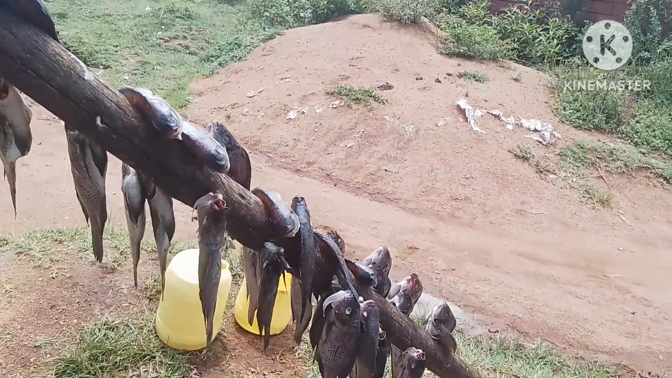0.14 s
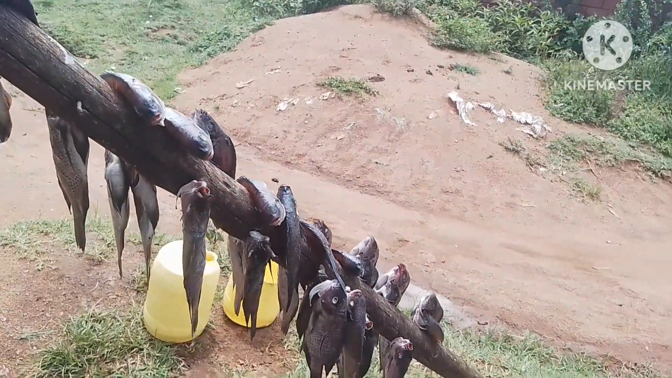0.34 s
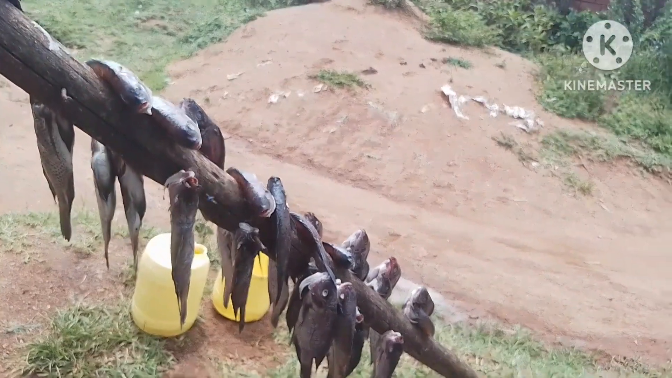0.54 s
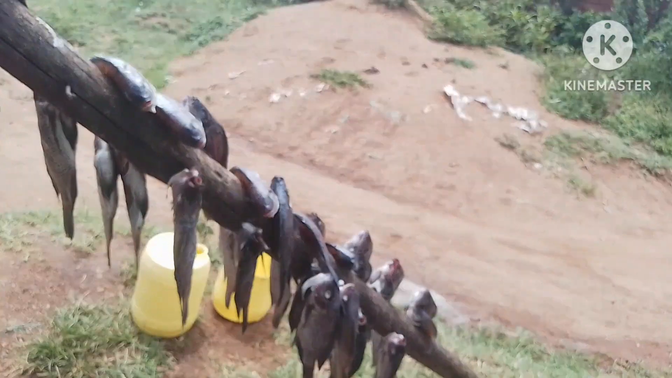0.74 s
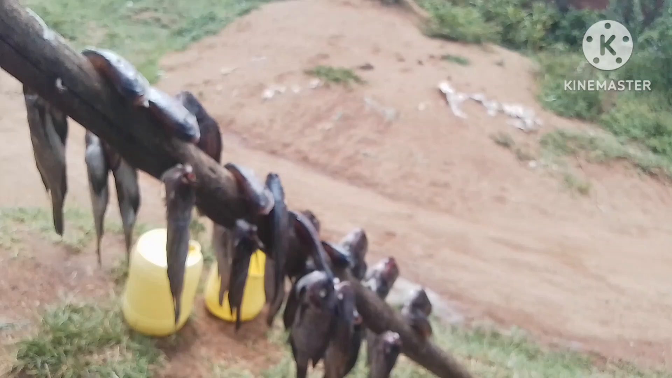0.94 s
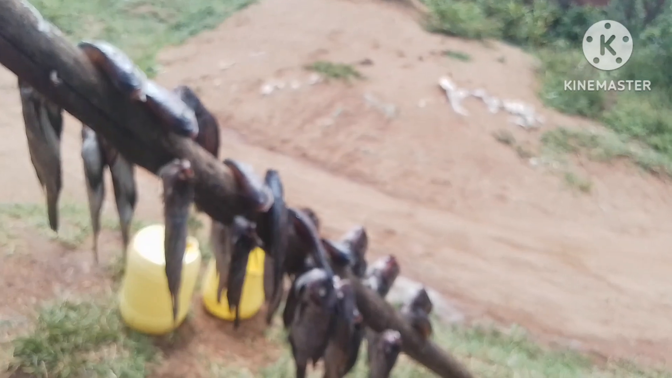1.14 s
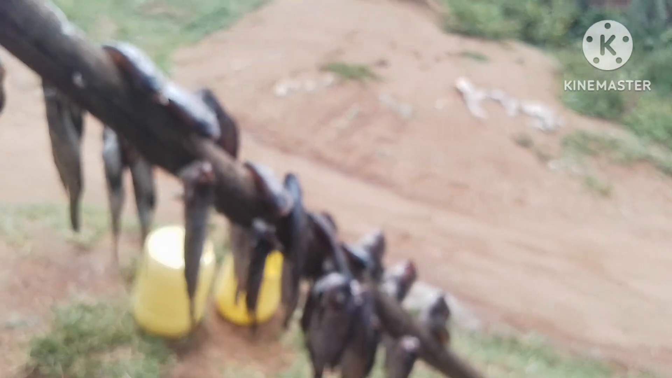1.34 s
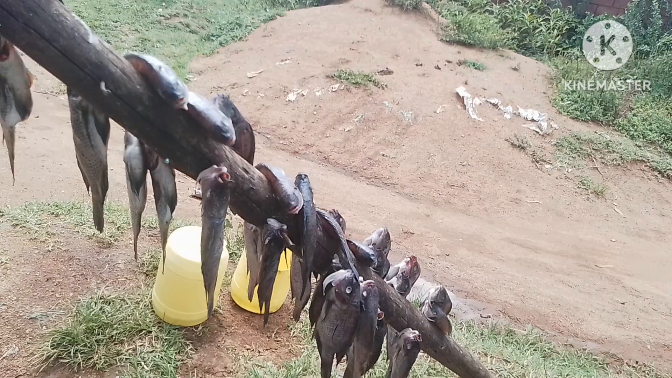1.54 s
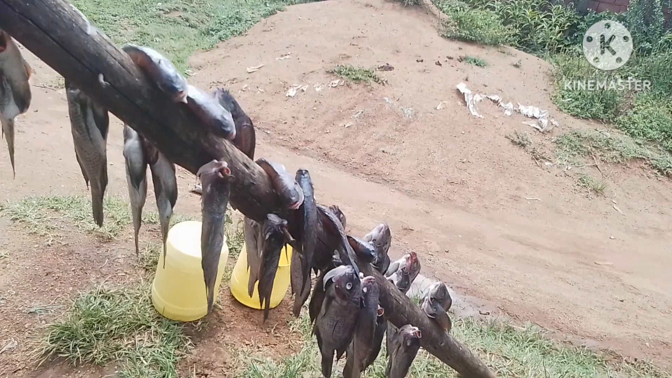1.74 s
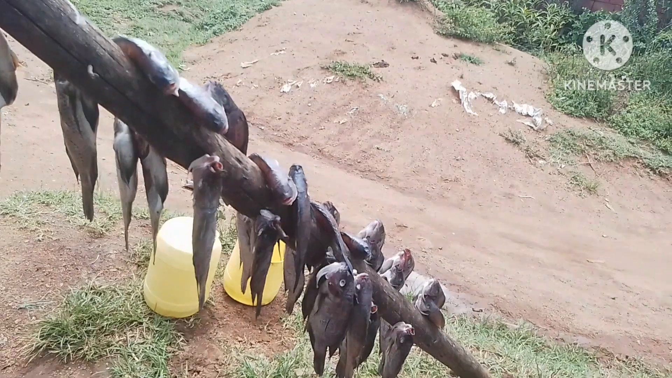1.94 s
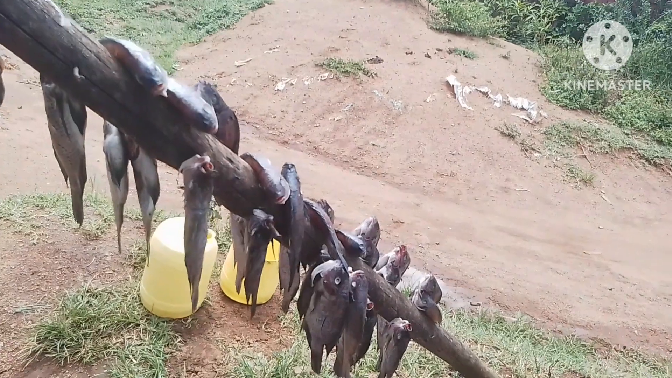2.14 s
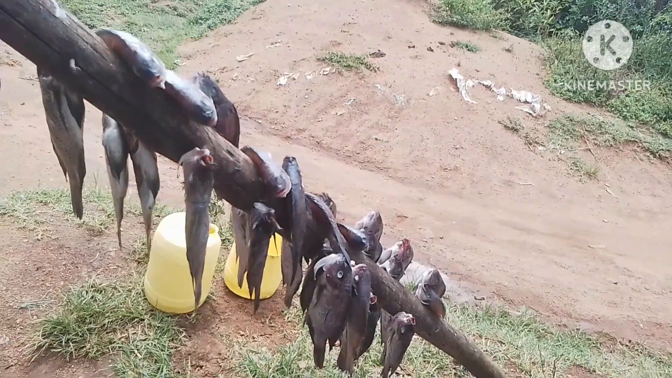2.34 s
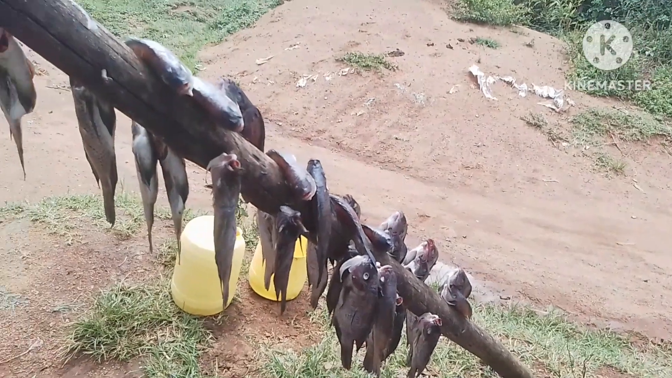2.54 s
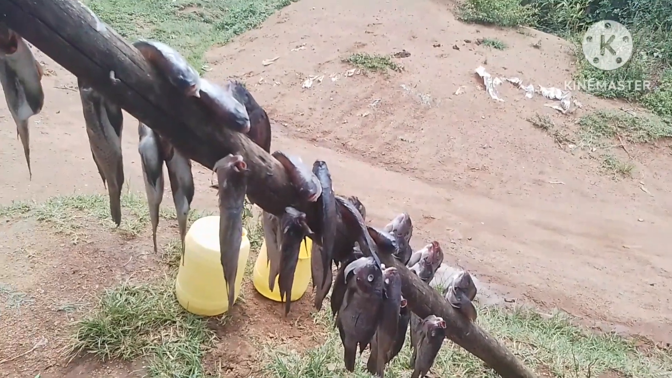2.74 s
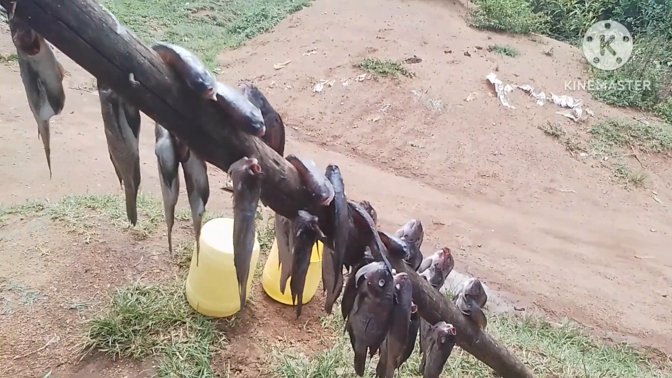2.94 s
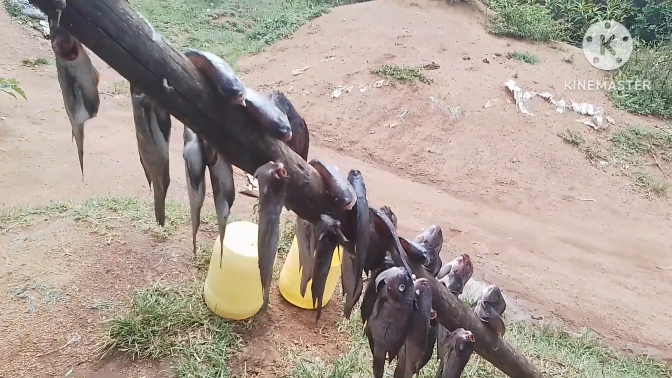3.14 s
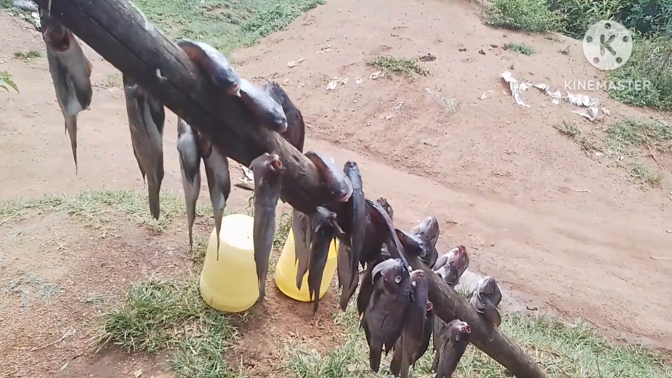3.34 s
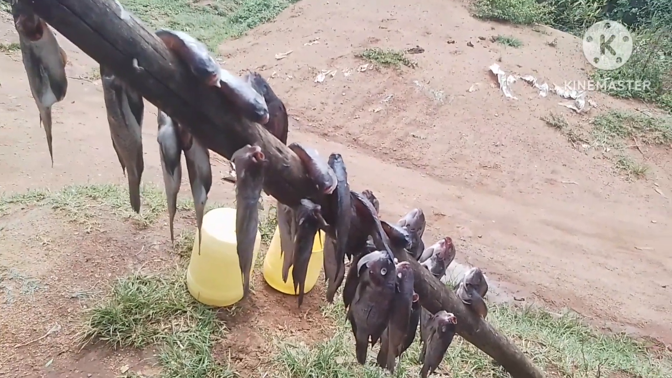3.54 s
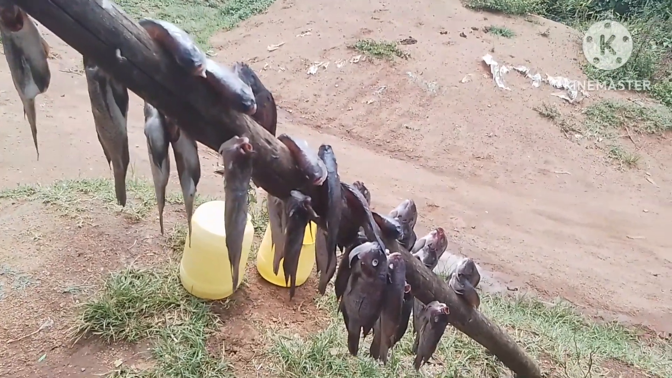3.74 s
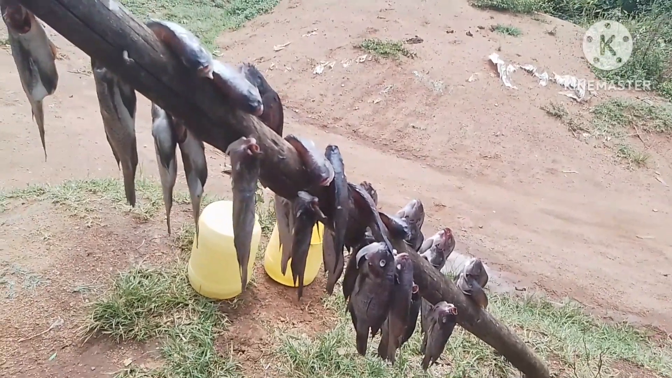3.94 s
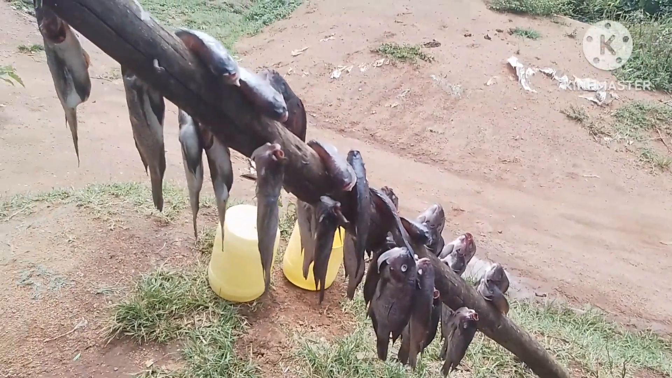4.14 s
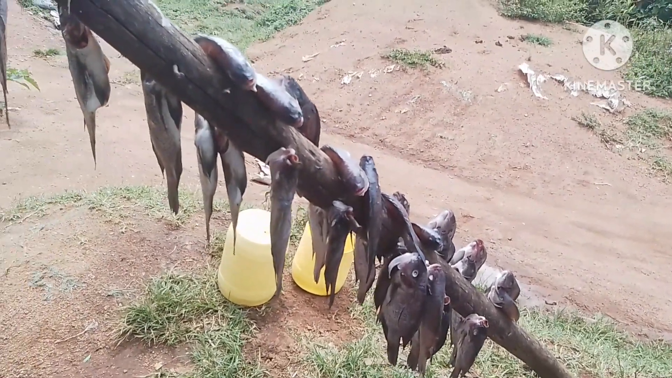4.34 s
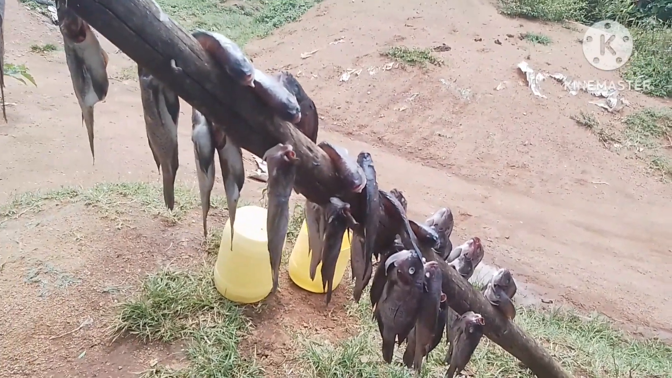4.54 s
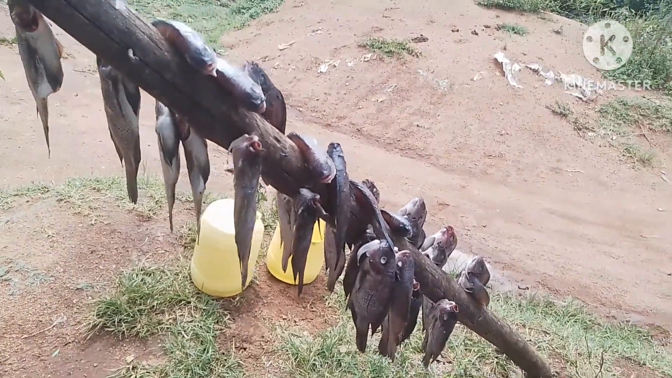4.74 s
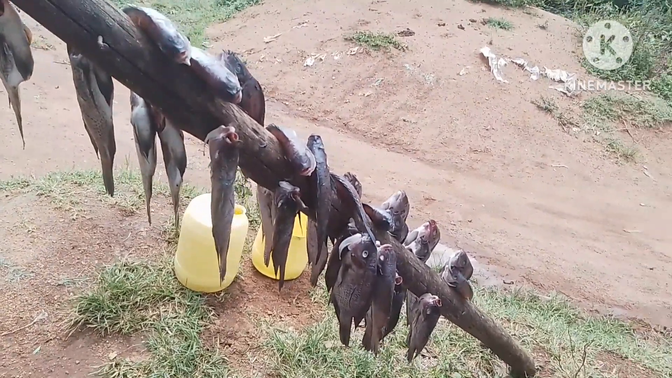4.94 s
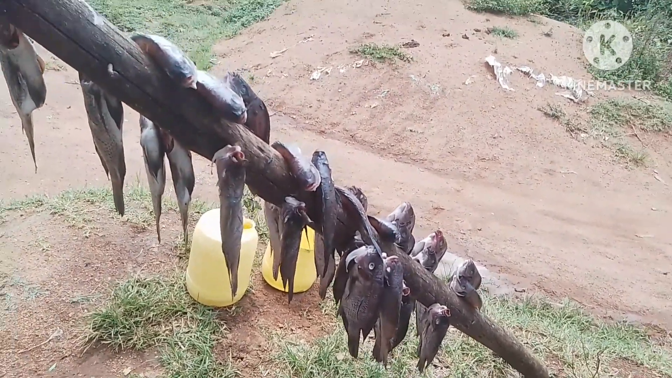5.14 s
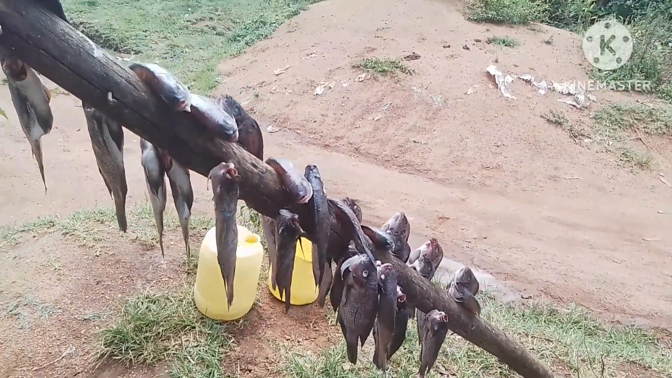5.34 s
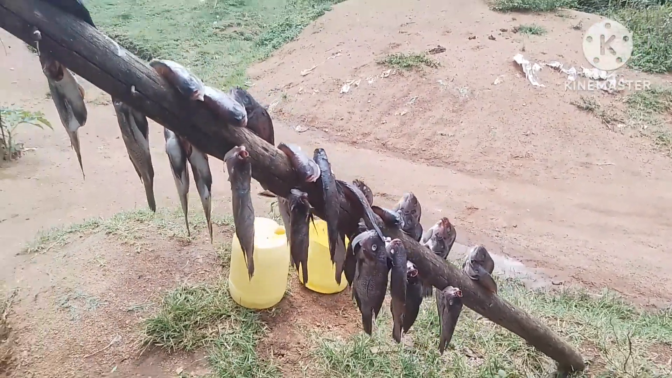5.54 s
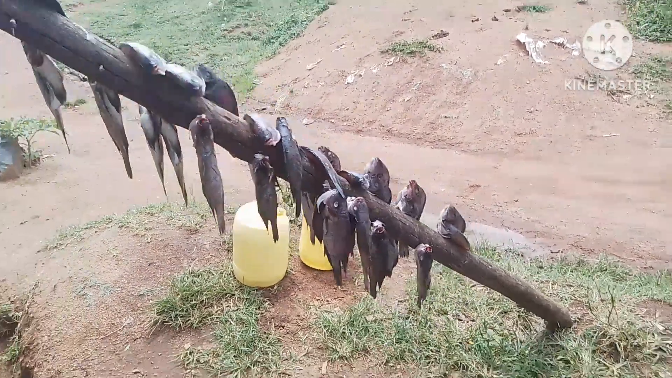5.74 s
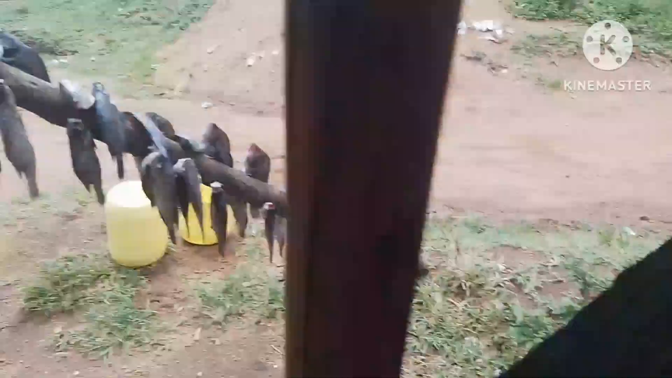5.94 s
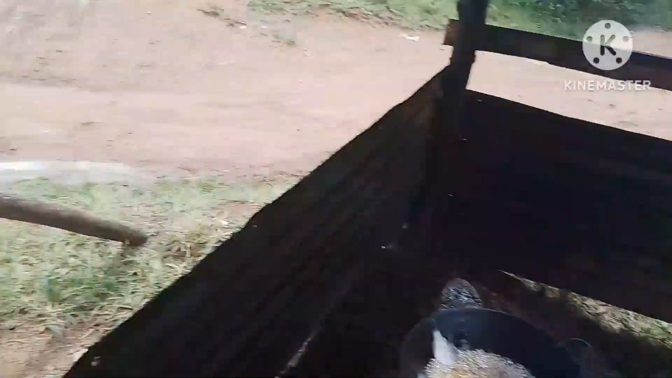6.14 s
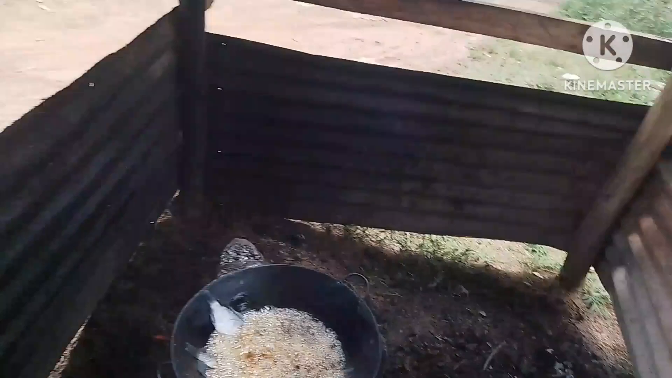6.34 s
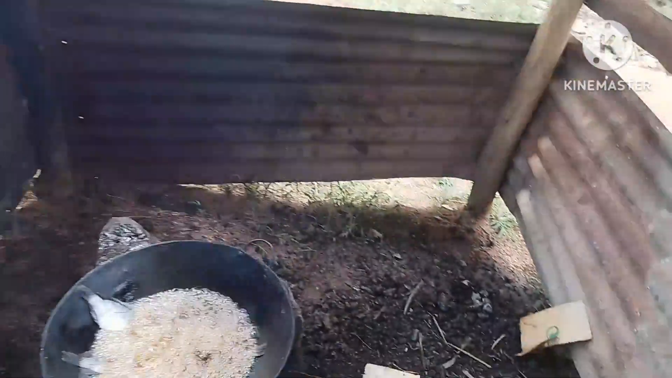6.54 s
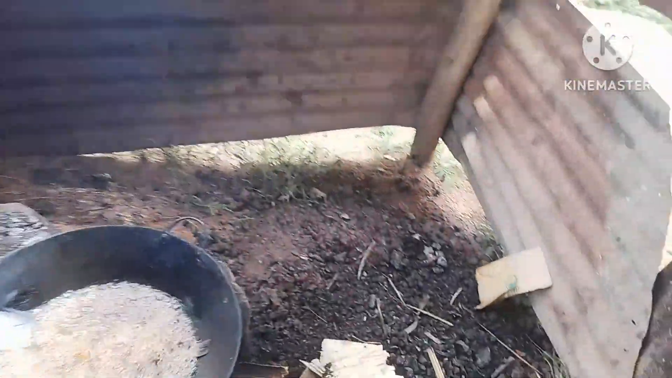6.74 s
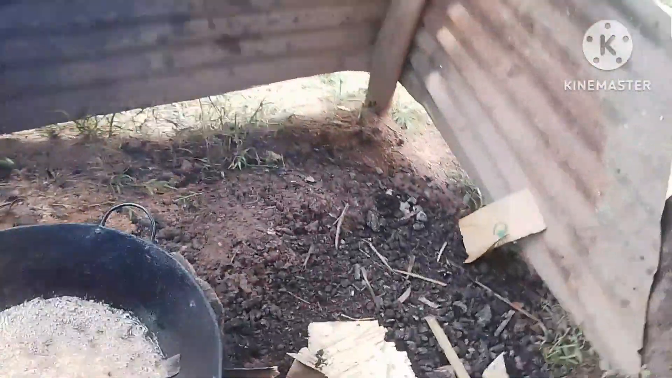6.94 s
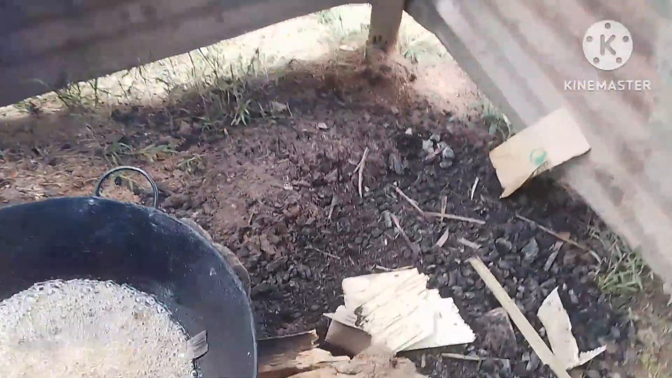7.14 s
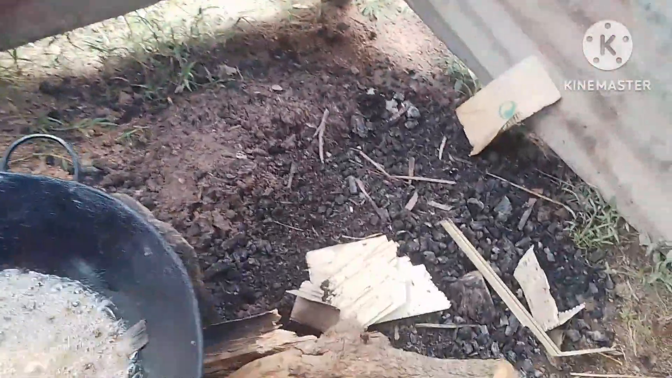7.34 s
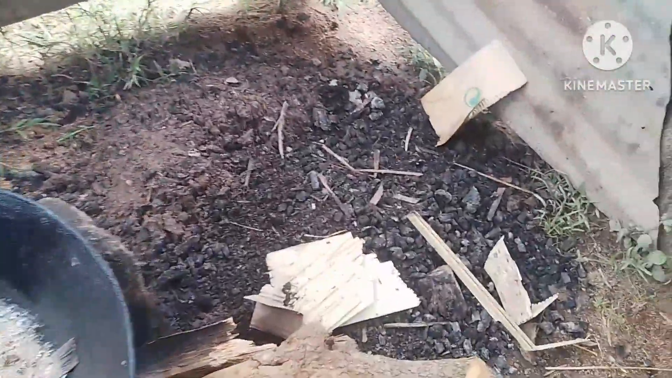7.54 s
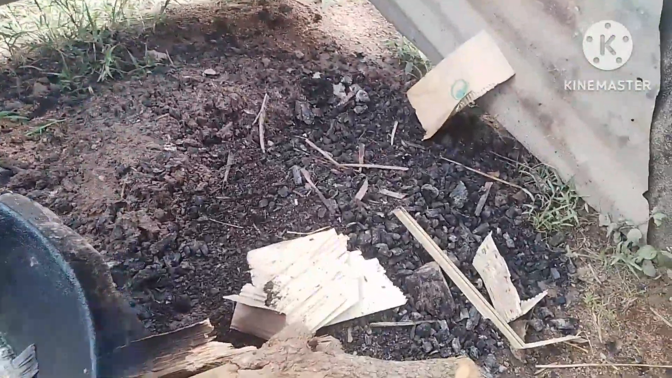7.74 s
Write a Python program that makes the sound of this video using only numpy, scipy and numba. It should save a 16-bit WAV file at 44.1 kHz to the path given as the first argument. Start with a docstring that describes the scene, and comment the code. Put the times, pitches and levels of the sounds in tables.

```python
"""In an open shelter of corrugated iron, fish fry in a wok of hot oil over charcoal; the microphone nears it late.
Steam bubbles are random clicks and decaying sines, filtered into sizzle, spray, foam and boil.
Droplets spit and steam pockets pop as dying noise; large bubbles, and a microphone knock, ring as gliding sines.
Outside, a far engine drones as a sum of harmonics that sink in pitch, until the shelter screens it.
A low rumble of filtered noise and a faint hum lie beneath. Mono, on two equal channels."""
import sys
import numpy as np
from scipy import signal
from scipy.fft import rfft, irfft
from scipy.io import wavfile
from scipy.ndimage import map_coordinates
from numba import njit

SR = 44100
rng = np.random.default_rng(int(sys.argv[2]) if len(sys.argv) > 2 else 0)


def inscribe(sig):
    """Save sig as 16-bit PCM at rate SR to the path in sys.argv[1].

    A 1-D sig is mono; a 2-D sig holds one channel per row.
    Samples are clipped to [-1, 1] before scaling.
    """
    pcm = np.round(np.clip(np.atleast_2d(sig).T, -1, 1) * 32767)
    wavfile.write(sys.argv[1], SR, pcm.astype(np.int16))


N = 343098
TIME = np.arange(N) / SR  # seconds


def sizzle(flurry):
    """Bubble resonance: tiny steam bubbles burst and ring round one bright pitch that rises over the oil."""
    # Spectrum of the sizzle before its pitch rises. Each row: frequency in Hz, level in dB.
    sizzle_colour = [(1000, -62.5), (2000, -21), (2750, -8.5), (3480, -2.5), (4300, 1.5), (5020, 4.5),
                     (5620, 2), (6350, -4.5), (7380, -8.5), (9000, -17.5), (15000, -29)]
    cracks = scatter(bursts(per_s=9000, spread_db=1.5), t60=0.04, wet_db=-2.0)
    rings = bubbles(count=5000, low_hz=2494, high_hz=6965, cycles=200, spread_db=2.5)
    fizz = colour(cracks + undb(-11.5) * rings, sizzle_colour)
    # reading the sound up to a tenth faster raises its pitch by that share
    reading_speed = 1 + np.interp(TIME, [6.25, 7.1], [0, 0.1])
    raised = map_coordinates(fizz, [np.cumsum(reading_speed)], order=3, mode="wrap")
    return unit(raised) * undb(0.55 * flurry + 0.35 * walk(count=160))


def spitting(flurry):
    """Impulsive excitation: fine droplets tick in the top octave, and fewer, sharper ones fly out."""
    # Spectrum of the fine spray. Each row: frequency in Hz, level in dB.
    spit_colour = [(4000, -16), (7000, -15), (8500, 0.5), (9800, 0.5), (11300, 5), (13000, -1),
                   (15500, -1.5)]
    ticks = scatter(bursts(per_s=5600, spread_db=4.0), t60=0.036, wet_db=4)
    rings = bubbles(count=4000, low_hz=7530, high_hz=13670, cycles=330, spread_db=3.5)
    strays = scatter(bursts(per_s=45, spread_db=2.8), t60=0.0064, wet_db=-21)
    sharp = resonate(strays, np.full(N, 13000.), 3000.)
    spray = colour(ticks + undb(-9.0) * rings, spit_colour)
    level_db = 1.0 * flurry + 0.65 * walk(count=14)
    return unit(spray + undb(-18) * unit(sharp)) * undb(level_db)


def seething(flurry):
    """Bubble resonance at middle size: bubbles break in the foam round the fish, crackling and ringing."""
    # Spectrum of the foam. Each row: frequency in Hz, level in dB.
    seethe_colour = [(800, -22.5), (1020, -14), (1120, -1.5), (1450, -1), (1750, 1), (2400, 6), (3200, 5),
                     (5000, -9.5)]
    crackle = bursts(per_s=5000, spread_db=1.0)
    rings = bubbles(count=5000, low_hz=957.6, high_hz=3125, cycles=88, spread_db=1.5)
    foam = colour(crackle + undb(-9.5) * rings, seethe_colour)
    return foam * undb(0.47 * flurry + 0.55 * walk(count=20))


def boiling():
    """Larger bubbles ring lower: they roll up through the deep oil in uneven waves."""
    # Spectrum of the boil. Each row: frequency in Hz, level in dB.
    boil_colour = [(150, -14), (300, -4), (400, 1), (475, 5), (540, 2.5), (640, 1.5), (820, 6), (1000, 3),
                   (1400, -2)]
    crackle = bursts(per_s=3500, spread_db=1.47)
    rings = bubbles(count=900, low_hz=338.8, high_hz=1006, cycles=74, spread_db=0.0)
    roll = colour(crackle + undb(-16.0) * rings, boil_colour)
    return roll * undb(0.68 * walk(count=8))


def splutter():
    """Transients standing out: spits and pops are damped noise; plops and one knock are damped sines."""
    # Levels here are relative within each group; a common gain follows.
    # Droplets spitting out of the oil. Each row: start in seconds, level in dB, pitch in Hz.
    spit_events = [(.0488, -16, 11500), (.291, -16, 11500), (.348, -14, 11500), (.576, -17, 8500),
                   (.6504, -7.5, 12000), (.6694, -14, 12000), (.7936, -8, 12000), (.8254, -11, 11500),
                   (.8904, -19, 14000), (1.954, -17, 11500), (3.7763, -12.5, 13000), (3.8, -15, 13500),
                   (4.097, -10, 11500), (4.134, -12, 11000), (4.9252, -9, 10900), (4.9938, -9, 12000),
                   (5.007, -13, 12500), (5.096, -17, 13500), (5.17, -13, 9500), (5.3114, -17, 13000),
                   (5.401, -12, 12500), (5.7553, -16, 11400), (6.0815, -11, 10500), (6.1735, -3, 14200),
                   (6.2726, -13, 9000), (6.315, -11, 11400), (6.6228, -13, 8300), (6.7361, -4, 11800),
                   (6.7555, -12, 12900), (6.781, -8, 12000), (6.8982, -10, 12000), (6.9237, -7, 11600),
                   (6.9865, -9, 9500), (7.076, -8, 12000), (7.0948, -6, 11000), (7.1418, -1.5, 11400),
                   (7.24, -6, 12500), (7.441, -6, 12000), (7.4914, -9, 11100), (7.5448, -2, 12500),
                   (7.6296, -8, 12100), (7.706, -6, 12500)]
    # Steam pockets bursting.
    # Each row: start in seconds, level in dB, pitch in Hz, bandwidth in Hz, T60 in seconds.
    pop_events = [(0.153, -7, 4960, 1200, 0.027), (0.251, -5, 4940, 1200, .025), (.617, -8, 5100, 800, .04),
                  (.649, -4, 5030, 1190, .045), (.956, -4, 4800, 1200, 0.033), (1.357, -8, 4000, 800, .047),
                  (1.656, -10.5, 4900, 1200, .03), (2.683, -6, 4840, 1200, .03),
                  (3.937, -9, 3900, 1800, .03), (3.951, -8, 4900, 1200, .04), (4.099, -4, 4710, 1000, .05),
                  (5.324, -8.5, 5130, 800, .04), (5.796, -6, 5050, 1200, .03), (6.08, -5.5, 4900, 800, .04),
                  (6.341, -11, 1500, 1500, 0.061), (6.357, -3, 4870, 1500, .05),
                  (6.362, -5, 1900, 1700, 0.05), (6.441, -6.5, 2400, 1800, .032),
                  (6.465, -14, 1250, 500, .04), (6.492, -1, 4900, 2000, .01), (6.558, -4, 5350, 1200, .04),
                  (6.634, 3.5, 4900, 2000, 0.024), (6.697, -2, 5400, 1800, .03),
                  (6.719, -3, 5100, 1200, .035), (6.861, 1, 5470, 800, 0.068),
                  (6.949, -6, 5400, 2500, .008), (6.959, -4, 5400, 2500, .008),
                  (7.015, -8, 5600, 1600, .02), (7.024, -2, 5600, 800, .03), (7.074, 0, 6000, 1600, .018),
                  (7.141, -1, 6600, 400, .028), (7.362, 2, 4900, 1800, .028), (7.477, 1, 5600, 800, 0.037),
                  (7.509, -17, 620, 400, .045), (7.57, -4, 3100, 1000, .06), (7.625, 4, 5340, 2500, .007),
                  (7.706, -4, 3000, 1200, 0.054), (7.721, -13, 1510, 900, .067)]
    # Large bubbles; the ring at 6.167 s is a knock from handling the microphone.
    # Each row: start in seconds, level in dB, pitch in Hz, T60 in seconds.
    ring_events = [(1.084, -25, 1220, .06), (1.478, -23, 465, .06), (1.849, -25, 822, .06),
                   (4.162, -30, 600, .05), (5.784, -22, 1500, .06), (6.167, -18.5, 466, .06),
                   (6.209, -24, 350, .065), (6.364, -29, 680, .05), (6.61, -25.5, 390, .05),
                   (6.808, -20, 1181, .055), (7.026, -23, 1210, .06), (7.032, -24.5, 450, .05),
                   (7.476, -15, 1170, .05), (7.509, -11.5, 1100, .055), (7.72, -20, 1160, .08),
                   (7.722, -26, 440, .06)]
    spits, pops, rings = np.zeros((3, N))
    for s, db, hz in spit_events:
        add(spits, s, undb(db) * puff(hz, width=11000, t60=0.021))
        # finer drops trail after each spit
        add(spits, s, undb(db - 10) * puff(hz, width=11000, t60=0.09))
    for s, db, hz, width, t60 in pop_events:
        add(pops, s, undb(db) * puff(hz, width, t60))
    for s, db, hz, t60 in ring_events:
        ring = bubble(hz, t60, glide=0.018)
        # noise roughens each ring: in a bubble, its skin tears
        rough = puff(hz, hz / 2, t60) / 2
        add(rings, s, undb(db) * (ring + rough) / 2)
    return undb(-8.0) * spits + undb(-8.5) * pops + undb(1.0) * rings


def walls(x, over_rim):
    """Interference of reflections: shelter and wok sides lift or hollow bands, shifting with the microphone."""
    # Three moving bands. Each row: time in seconds, centre frequency in Hz, gain at the centre in dB.
    crest_band = [(0, 5200, 0.5), (2.2, 4500, -1), (2.8, 4700, 2.5), (4.6, 4960, -1), (5.4, 4800, -1.5),
                  (5.72, 4500, -6), (5.95, 4670, -2.5), (6.2, 5100, 3), (6.55, 5300, 2), (6.9, 5600, 0.5),
                  (7.1, 5900, 1), (7.4, 5670, 0.5), (7.78, 5850, 1.5)]
    upper_band = [(0, 4100, 0), (.5, 4000, 2.5), (.95, 2800, 1.5), (1.4, 2570, -0.5), (5.4, 2400, -0.5),
                  (5.7, 2480, -8.5), (5.88, 2800, -1), (6.05, 3200, 3.5), (6.28, 2980, 2), (6.42, 3500, -2),
                  (6.7, 3500, 0.5)]
    lower_band = [(0, 830, 2.5), (.55, 844, 2.5), (.75, 1100, -4), (1.2, 1640, 3.5), (5.4, 1580, 1.5),
                  (5.95, 2020, 7.5), (6.17, 1730, -8), (6.4, 1930, 5), (6.7, 1720, 6.5), (7.05, 1650, -5),
                  (7.3, 2000, 2), (7.78, 1900, 3)]
    for band, width_hz in (crest_band, 600.), (upper_band, 1160.), (lower_band, 160.):
        hz, db = curves(band)
        x = x + (undb(db) - 1) * resonate(x, hz, width_hz)
    # above the wok a 3 dB gap opens just under the foam
    hollow = resonate(x, np.full(N, 900.), 160.)
    return x + (undb(-3 * over_rim) - 1) * hollow


def engine():
    """Harmonic series of a firing rate: the drone sinks in pitch and wavers until the iron screens it."""
    # Harmonics of the engine, with levels before and after its change of tone.
    # Each row: multiple of the firing rate, earlier level in dB, later level in dB.
    engine_orders = [(3, -19.5, -19), (4, -7, -7.5), (5, -9, -5.5), (6, -7, 2), (7, -6, -12),
                     (8, -11, -3.5), (9, -19, -5), (10, -24, -10.5), (11, -15, 1.5)]
    # Single harmonics swell out of the drone or drop away for a moment.
    # Each row: multiple, time of the middle in seconds, width at half height in seconds, change in dB.
    engine_swells = [(3, 0.86, .3, 16), (4, 0.67, 0.61, -11), (4, 2, 0.52, 5), (4, 2.88, .25, -14),
                     (4, 4.1, .2, -12), (4, 4.72, .22, -14), (4, 5.82, 0.3, 8), (5, 1.4, 1.2, 0),
                     (5, 2.55, .5, 8), (5, 3.04, 0.23, -12), (6, 1.22, 0.18, 5.5), (6, 2.76, .55, 5),
                     (6, 3.35, .14, -12), (6, 4.02, 0.11, -11), (6, 5, .09, -14), (6, 5.4, 0.2, 5.5),
                     (6, 5.8, 0.35, -12), (6, 6.28, 0.32, 3.5), (7, 0.87, 1.3, -3), (7, 2.22, 0.28, 7),
                     (7, 2.55, .25, -8), (7, 3.05, 0.27, 4), (7, 4.35, .3, 7), (10, 4.82, .18, 16),
                     (11, 4.7, 0.093, -3), (11, 5.3, .15, -6), (11, 5.95, .15, -3)]
    firing_hz = 32.2 - 0.71 * TIME
    phase = 2 * np.pi * np.cumsum(firing_hz) / SR
    # loudest at 3.4 s, growing and fading by 0.7 dB a second
    level_db = -51.5 - 0.7 * np.abs(TIME - 3.4)
    level_db += -30 * ramp(6.58, length=0.32)  # the iron walls cut off the engine
    # most of the upper harmonics come through between these times
    near = np.interp(TIME, [3.15, 4.8], [0, 1])
    drone = np.zeros(N)
    for k, far_db, near_db in engine_orders:
        # moving air makes each harmonic fade and wander in phase, the high ones wandering most
        wander = 2 * np.pi * rng.random() + k / 12 * walk(count=9)
        swell_db = sum(db * swell(s, length) for multiple, s, length, db in engine_swells if multiple == k)
        order_db = far_db + near * (near_db - far_db) + swell_db + 2.0 * walk(count=4)
        drone += undb(order_db) * np.sin(k * phase + wander)
    return np.sqrt(2) * drone * undb(level_db)


def hum():
    """Pure tone: a faint sine of fixed pitch whose level drifts a little."""
    return np.sin(2 * np.pi * 104 * TIME) * undb(-64 + 2 * walk(count=2))


def rumble():
    """Filtered noise: a low outdoor rumble that swells once and wavers."""
    # Spectrum of the rumble. Each row: frequency in Hz, level in dB.
    outdoor_colour = [(18, -7), (30, -18), (50, -27), (75, -19), (105, -5.5), (200, -6.5), (280, 0),
                      (450, -12), (1500, -78)]
    level_db = -56.5 + 8.5 * swell(5.7, length=2.2)
    noise = colour(rng.standard_normal(N), outdoor_colour)
    return noise * undb(level_db + 1.8 * walk(count=9))


def bubble(hz, t60, glide):
    """Bubble resonance: a damped sine rises in pitch by the share `glide`, as for a bubble nearing the surface."""
    ring = fade(t60)
    pitch = hz * (1 + glide * np.linspace(0, 1, len(ring)))
    turns = np.cumsum(pitch) / SR
    onset = 1 - np.exp(-turns)
    return ring * onset * np.sin(2 * np.pi * turns)


def bubbles(count, low_hz, high_hz, cycles, spread_db):
    """Superposition: a swarm of bubbles with random times, pitches and levels; T60 spans `cycles`; rms 1."""
    out = np.zeros(N)
    for when, pitch, size in rng.random((count, 3)):
        hz = low_hz * (high_hz / low_hz) ** pitch
        gain = undb(-spread_db * np.log(size + 0.01))
        add(out, when * N / SR, gain * bubble(hz, cycles / hz, glide=0.047))
    return unit(out)


def bursts(per_s, spread_db):
    """Poisson-like process: randomly timed clicks of either sign, many small and a few large; rms 1."""
    happens = rng.random(N) < per_s / SR
    size = undb(spread_db * np.minimum(rng.exponential(size=N), 6))
    return unit(happens * size * rng.choice([-1, 1], N))


def scatter(x, t60, wet_db):
    """Diffuse reflection: wok sides and iron walls follow each click with decaying random echoes; rms 1."""
    energy = np.abs(signal.fftconvolve(x ** 2, fade(t60) ** 2)[:N])  # abs removes rounding below zero
    echoes = unit(np.sqrt(energy) * rng.standard_normal(N))
    return unit(x + undb(wet_db) * echoes)


def puff(hz, width, t60):
    """Damped noise: a dying burst passes twice through one band-pass; peak 1."""
    ring = fade(t60)
    centre = np.full(len(ring), float(hz))
    burst = ring * rng.standard_normal(len(ring))
    for _ in range(2):
        burst = resonate(burst, centre, float(width))
    return burst / np.abs(burst).max()


@njit
def resonate(x, hz, width):
    """Resonance: a state-variable band-pass whose centre may move; gain 1 at the centre."""
    y, band, low = np.empty(len(x)), 0., 0.
    for i in range(len(x)):
        g = np.tan(np.pi * hz[i] / SR)
        damping = width / hz[i]
        v = (band + g * (x[i] - low)) / (1 + g * (g + damping))
        band = 2 * v - band
        low = low + 2 * g * v
        y[i] = damping * v
    return y


def colour(x, points):
    """Minimum-phase filtering: a cepstrum gives the causal filter through (Hz, dB) points; rms 1."""
    hz, db = np.transpose(points)
    size = 4096
    grid = np.maximum(np.fft.rfftfreq(size, 1 / SR), 1)
    cepstrum = irfft(np.log(undb(np.interp(np.log(grid), np.log(hz), db))))
    # folding the second half onto the first makes the filter causal
    cepstrum[1:size // 2] *= 2
    cepstrum[size // 2 + 1:] = 0
    impulse_response = irfft(np.exp(rfft(cepstrum)))
    return unit(signal.fftconvolve(x, impulse_response)[:N])


def fade(t60):
    """Exponential decay: falls by 60 dB in t60 seconds."""
    t = TIME[:int(t60 * SR) + 2]
    return np.exp(-np.log(1000) * t / t60)


def walk(count):
    """Random modulation: lines join `count` new chance values a second; rms 1."""
    knots = rng.standard_normal(int(count * N / SR) + 2)
    return unit(np.interp(TIME * count, np.arange(len(knots)), knots))


def ramp(s, length):
    """Linear transition: from 0 to 1 over `length` seconds centred on s."""
    return np.clip((TIME - s) / length + 0.5, 0, 1)


def swell(s, length):
    """Gaussian envelope: a bell of height 1 at s, `length` seconds wide at half height."""
    return 0.5 ** ((2 * (TIME - s) / length) ** 2)


def curves(rows):
    """Linear interpolation: each column of a table, joined by straight lines in time."""
    s, *columns = np.transpose(rows)
    return [np.interp(TIME, s, c) for c in columns]


def add(track, s, sound):
    """Superposition: mix a short sound in at time s."""
    start = max(int(s * SR), 0)
    part = track[start:start + len(sound)]
    part += sound[:len(part)]


def undb(db):
    """Logarithmic level: decibels to amplitude gain."""
    return 10 ** (np.asarray(db) / 20)


def unit(x):
    """Normalisation: scale to rms 1."""
    return x / np.sqrt(np.mean(x ** 2))


def scene():
    """Common modulation: flurries drive sizzle, spray and foam; nearness raises them, the boil hardly changes."""
    # How much louder the sizzle is as the microphone moves. Each row: time in seconds, gain in dB.
    nearness = [(0, 0), (1.0, 0.5), (2.0, -0.1), (3.0, 0.25), (4.6, 0.1), (5.7, 2), (6.25, 5.5), (6.9, 8.5),
                (7.78, 8.5)]
    # Extra level of the spray, strong where the microphone faces the oil.
    # Each row: time in seconds, gain in dB.
    spray_level = [(5.4, -6), (5.9, 0.5), (6.15, -3), (6.45, -3.5), (6.77, 1.5), (7.05, 2), (7.35, -0.5),
                   (7.55, -1), (7.69, 3), (7.76, -4)]
    # The frying surges or lulls.
    # Each row: time of the middle in seconds, width at half height in seconds, change in dB.
    surges = [(0.618, .087, 1), (4.6, 0.32, 0), (6.486, .048, -3.5), (6.607, 0.061, -2.5),
              (6.672, 0.046, -2.5), (6.99, .03, 0.5), (7.11, .04, -4), (7.16, 0.031, -5),
              (7.25, 0.061, 2.5), (7.308, 0.019, 1.5), (7.332, 0.035, -5.5), (7.382, 0.035, -3.5),
              (7.497, 0.18, 2), (7.685, 0.051, 2), (7.775, .06, -1.5)]
    [near_db] = curves(nearness)
    [spray_db] = curves(spray_level)
    surge_db = sum(db * swell(s, length) for s, length, db in surges)
    # foam and boil are livelier at first and settle
    settle_db = 2 * np.exp(-TIME ** 2)
    # the microphone comes over the rim and faces the oil
    over_rim = ramp(6.68, length=0.11)
    # close up, single pockets of steam dominate and the flurries deepen
    depth = np.interp(TIME, [5.8, 6.8], [1, 1.3])
    flurry = depth * unit(walk(count=30) + 0.17 * walk(count=90))

    # base levels are those from afar; foam, boil and spray follow nearness or surges only in part
    sizzle_db = -27 + near_db + surge_db
    spitting_db = -37 + near_db + 0.25 * surge_db + spray_db
    foam_db = -35 + 0.86 * near_db + 0.87 * surge_db + settle_db
    boil_db = -34 + 0.074 * near_db + 0.87 * surge_db + settle_db
    boil_db += -1.5 * over_rim  # the boil is weaker over the rim
    wok = sizzle(flurry) * undb(sizzle_db)
    wok += spitting(flurry) * undb(spitting_db)
    wok += seething(flurry) * undb(foam_db)
    wok += boiling() * undb(boil_db)
    mono = walls(wok, over_rim) + splutter() + engine() + hum() + rumble()
    return np.array([mono, mono])


def record(dry):
    """Band limiting: the recorder thins the bass below 50 Hz and cuts the top steeply above 15450 Hz."""
    bass_cut = signal.butter(2, 50, "highpass", fs=SR, output="sos")
    top_cut = signal.ellip(12, 0.1, 85, 15450, fs=SR, output="sos")
    thin = signal.sosfilt(bass_cut, dry)
    return signal.sosfilt(top_cut, thin)


dry = scene()
out = record(dry)
inscribe(out)
```